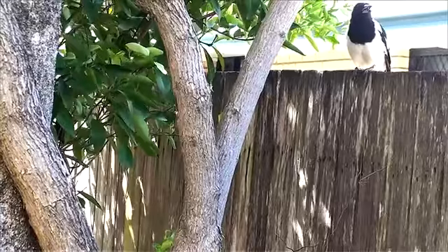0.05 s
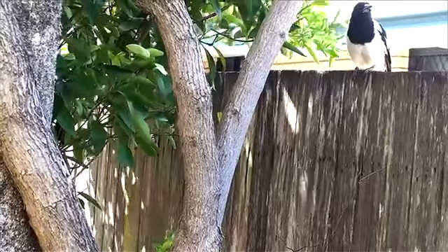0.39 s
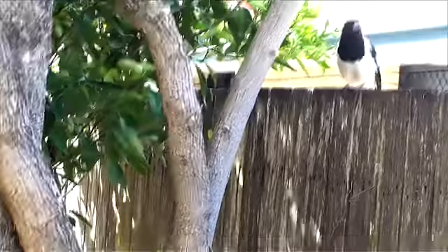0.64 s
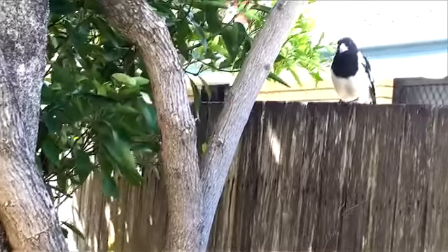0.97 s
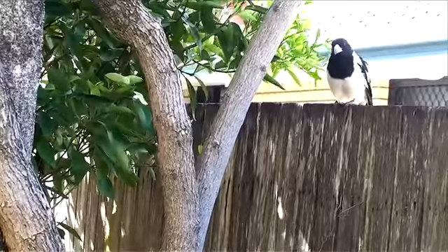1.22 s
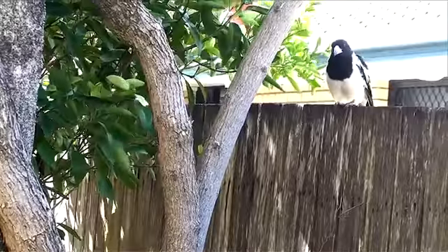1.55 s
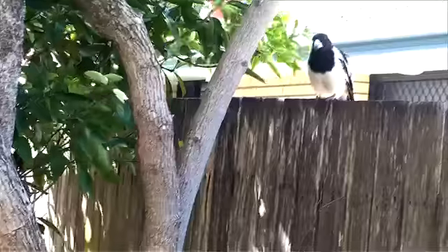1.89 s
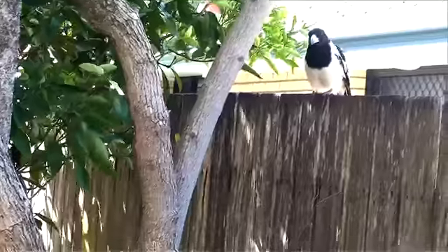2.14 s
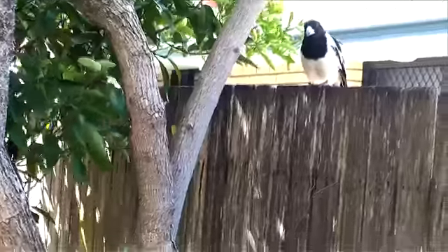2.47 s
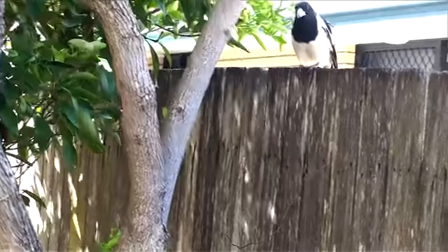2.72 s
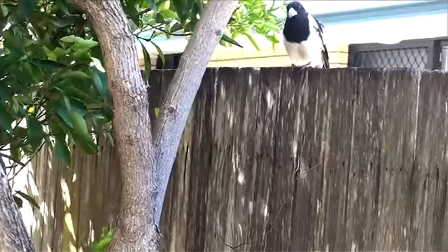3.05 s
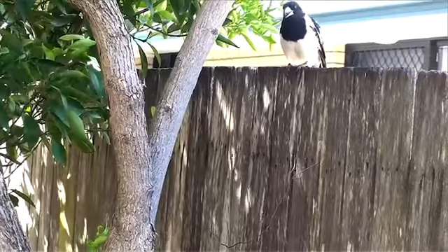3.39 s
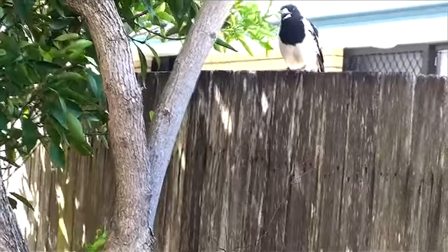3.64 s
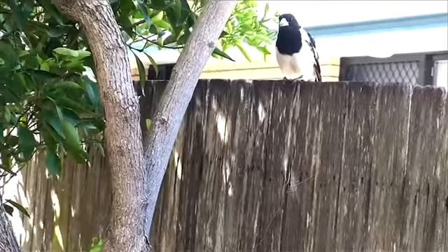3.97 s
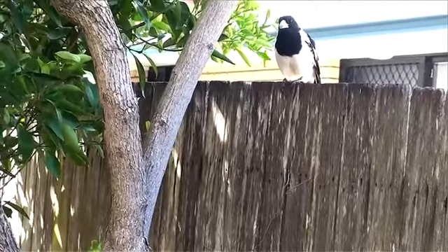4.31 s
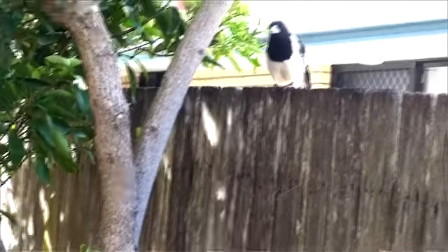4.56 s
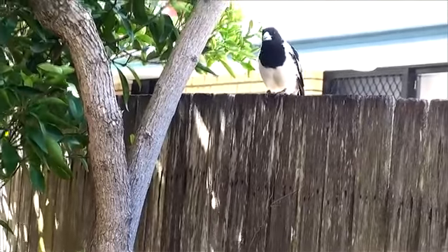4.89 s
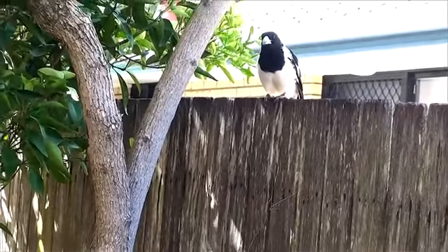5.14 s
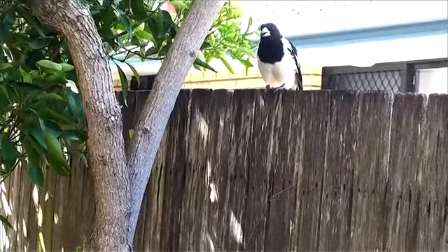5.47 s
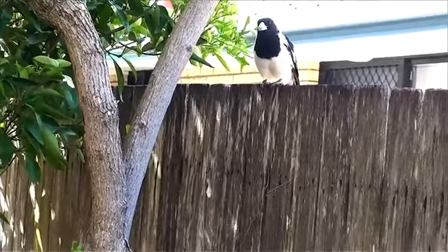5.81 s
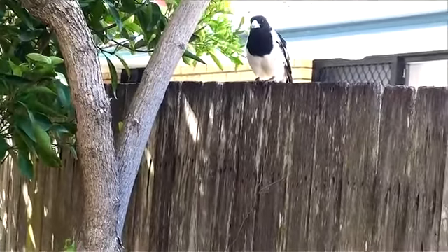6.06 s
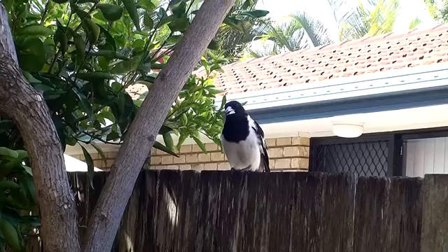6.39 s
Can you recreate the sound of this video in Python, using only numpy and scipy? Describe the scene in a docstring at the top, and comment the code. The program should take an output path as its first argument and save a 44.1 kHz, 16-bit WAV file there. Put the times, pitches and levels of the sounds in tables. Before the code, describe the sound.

Fluted notes, sharp whips and piping from one bird, with another chirping thinly farther off, over soft hiss and low wind rumble.

```python
"""A black-and-white songbird on a garden fence sings a quiet, varied song: fluted notes, two-voiced
chuckles, whip-like glides, rasps and a piping trill. Each side of its syrinx is an oscillator whose
overtones are filtered by the beak; the rasps are throat noise. Another bird answers with thin rising
chirps. Fence, ground and house reflect the sound and leaves scatter it, over distant traffic, leaf
hiss and puffs of wind that rumble on the microphone."""
import sys
import numpy as np
from scipy import signal
from scipy.fft import rfft, irfft, next_fast_len
from scipy.io import wavfile
from scipy.ndimage import uniform_filter1d, map_coordinates

SR = 44100
rng = np.random.default_rng(int(sys.argv[2]) if len(sys.argv) > 2 else 0)


def generate_wav(sig):
    """Save sig (samples, or channels by samples) to the path in sys.argv[1] as 16-bit PCM at SR."""
    pcm = np.round(np.clip(np.atleast_2d(sig).T, -1, 1) * 32767).astype(np.int16)
    wavfile.write(sys.argv[1], SR, pcm)


N = 287973

# The long fluted note sinks slowly, with one small lift: t/s, f/Hz
FLUTE_MELODY = [(2.51, 807), (2.55, 768), (2.62, 803), (2.644, 885), (2.674, 817), (2.78, 765),
                (2.92, 730.5), (3.0, 712), (3.07, 679), (3.115, 650)]
# Its swells: t/s, length/s, crest/fraction of length, level/dB, overtones/dB re fundamental
FLUTE_PULSES = [(2.52, 0.068, 0.9, -24, -36), (2.587, 0.049, 0.31, -21, -38),
                (2.644, 0.026, .5, -27.5, -32), (2.67, .05, 0.39, -20.5, -38),
                (2.734, 0.091, 0.77, -18, -33), (2.842, 0.086, 0.13, -24, -22.5),
                (2.934, 0.17, 0.24, -27, -31)]
FLUTE_TAPER_S, FLUTE_TAPER_DB = .035, 12
# Two voices about a fourth apart: peak t/s, length/s, low f/Hz, level/dB, high f/Hz, level/dB
CHUCKLE_PAIRS = [(1.083, 0.041, 884, -31.5, 1155, -34), (1.217, 0.037, 850, -38, 1132, -31),
                 (1.29, 0.04, 902, -24, 1080, -36.5), (1.315, .026, 820, -35, 1030, -40),
                 (1.39, 0.033, 889, -30.5, 1142, -29)]
# Glides: t/s, length/s, start f/Hz, end f/Hz, crest/fraction of length, relative level/dB,
# overtones/dB re fundamental
WHISTLE_GLIDES = [(.645, 0.028, 1660, 1400, 0.45, -40, -30), (2.35, 0.046, 1233, 1225, 0.99, -25.5, -30),
                  (2.402, 0.024, 1170, 1084, .4, -32.5, -30), (4.338, 0.05, 1206, 1205, 0.96, -27, -23),
                  (4.39, .032, 1500, 1636, 0.14, -29, -30)]
WHIP_GLIDES = [(0, 0.02, 3730, 2860, 0.15, -27.5, -21.5), (.024, 0.021, 2680, 2740, 0.74, -26, -14.5),
               (.051, 0.035, 2743, 2890, .38, -13.5, -22.5)]
ZIP_GLIDES = [(.268, .044, 4396, 1595, 0.45, -29.5, -15.5), (3.41, 0.021, 1786, 2250, .3, -39.5, -25),
              (3.436, 0.067, 2660, 6400, 0.42, -25, -21), (3.818, .02, 1906, 2450, .3, -38, -24),
              (3.846, 0.03, 2950, 4610, .5, -27, -18), (3.96, 0.03, 2253, 2520, 0.43, -39, 2)]
WHEEZE_GLIDES = [(1.83, 0.063, 2250, 2300, .6, -36.5, -9), (1.895, 0.079, 2160, 2330, 0.37, -32, -21),
                 (1.835, 0.11, 4600, 3800, .4, -41, -24), (1.975, .048, 3950, 3400, .6, -37.5, -22)]
GROWL_GLIDES = [(6.165, 0.028, 1047, 1070, 0.42, -41, -20), (6.235, 0.044, 1090, 1120, 0.8, -39, -26),
                (6.31, 0.048, 761, 813, 0.5, -32.5, -4), (6.385, 0.037, 845, 930, 0.91, -38, -6),
                (6.45, 0.061, 770, 985, .4, -35.5, -3)]
# Arches: t/s, length/s, start f/Hz, crest f/Hz, end f/Hz, level/dB, overtones/dB re fundamental
SQUEAL_ARCHES = [(.43, 0.055, 4200, 4296, 4270, -32.5, -14), (.48, 0.046, 4390, 4660, 4210, -25.5, -9),
                 (.512, 0.022, 4300, 4000, 3900, -32.5, -16), (.517, .034, 4650, 4720, 4580, -24.5, -12),
                 (.556, 0.032, 4560, 4500, 4530, -27.5, -13)]
PIPE_ARCHES = [(5.382, 0.039, 2596, 2850, 2280, -22, -21), (5.457, .046, 2420, 2818, 2390, -21.5, -29),
               (5.463, 0.028, 3150, 3190, 3080, -38, -30), (5.544, .047, 2600, 2780, 2584, -15, -27),
               (5.64, 0.04, 2596, 2665, 2570, -14, -17), (5.736, 0.04, 2756, 2666, 2606, -16.5, -11.5)]
CHURR_ARCHES = [(4.836, 0.022, 2038, 2170, 1950, -35.5, -16), (4.866, .05, 2204, 2510, 2340, -28.5, -22),
                (4.918, 0.033, 2400, 2440, 2105, -27.5, -16), (4.958, .036, 2300, 2460, 2400, -40, -20)]
# One loud downward crack: t/s, f/Hz, level/dB, overtones/dB re fundamental
CRACK_CONTOUR = [(3.612, 4510, -42, -18), (3.632, 3780, -29.5, -19), (3.636, 2975, -19, -20),
                 (3.651, 2590, -15, -12), (3.676, 1980, -19.5, -26), (3.686, 1865, -32, -30)]
# Bursts of throat noise: t/s, length/s, relative level/dB
CHURR_RASPS = [(4.832, .012, -38), (4.868, 0.084, -39), (4.965, 0.053, -45)]
GROWL_RASPS = [(6.17, .12, -44), (6.315, 0.062, -35), (6.39, .06, -38), (6.465, .05, -35.5)]
# Their spectra: f/Hz, relative level/dB
CHURR_SPECTRUM = [(1200, -40), (2300, 5), (3100, -7), (3750, 5), (4300, -3), (7000, -6), (10000, -15),
                  (13000, -14), (15000, -29)]
GROWL_SPECTRUM = [(450, -35), (800, 6), (1250, -2), (1600, -4), (2100, -4), (2800, -27), (5000, -50)]
# Beak response, a further gain on the songbird's overtones: f/Hz, gain/dB
BEAK_RESPONSE = [(1500, 2.5), (5400, -3.5), (7000, 3.5), (8100, 9.5), (9300, -4.5), (11000, 1.5),
                 (14000, -4)]
# The other bird's upslurs: t/s, length/s, start f/Hz, end f/Hz, fundamental/dB, octave/dB
ANSWER_CHIRPS = [(0.158, 0.031, 2427, 3040, -42, -37.5), (.548, 0.017, 2630, 2880, -65, -36),
                 (1.058, 0.039, 2450, 3166, -41.5, -36), (1.796, 0.037, 2320, 3030, -40, -33),
                 (2.87, .03, 2485, 2976, -37, -40.5), (4.475, 0.041, 2440, 2955, -31, -34)]

# Reflections from fence, ground and house: delay/s, gain/dB
ECHO_PATHS = [(.0085, -12), (0.0121, -10.5), (0.026, -15.5), (0.051, -24)]
# Reverberation times: f/Hz, T60/s
LEAF_DECAY = [(700, 0.024), (3000, 0.1), (9000, .1)]
GARDEN_DECAY = [(700, 0.1), (2700, 0.55), (5000, 0.36), (10000, 0.32)]
# Initial spectrum of both diffuse fields: f/Hz, relative level/dB
DIFFUSE_SPECTRUM = [(700, 11), (1300, 7), (2700, -7.5), (5000, -3), (9000, 0)]

# Spectra of traffic, leaf hiss, its thin top and wind: f/Hz, relative level/dB
TRAFFIC_SPECTRUM = [(13, -34), (22, 1.5), (91, -1), (123, -3), (162, -1.5), (242, -6.5), (374, -4.5),
                    (675, -6.5), (749, -7), (1400, -11.5), (1820, -16), (3080, -120)]
HISS_SPECTRUM = [(530, -31), (900, -1.5), (1080, -6), (1500, -9), (1680, -5.5), (3610, -8), (4160, -8.5),
                 (6540, -8.5), (10500, -16.5), (13600, -46), (22000, -120)]
HISS_TOP_SPECTRUM = [(9500, -47), (11000, -12), (11400, -0.5), (12800, -4.5), (14000, -11), (15000, -19)]
WIND_SPECTRUM = [(12, -33), (22, -0.5), (43, -1), (75, 0.5), (140, -10.5), (220, -17.5), (320, -30),
                 (500, -33), (800, -82)]
# Slow swells of traffic and hiss: t/s, relative level/dB
TRAFFIC_SWELL = [(0.0, -49), (4.38, -41), (6.53, -42)]
HISS_SWELL = [(0, -52), (1.5, -49.5), (3.2, -48), (4.7, -46.5), (6.53, -47)]
# Puffs of wind on the microphone: peak t/s, length/s, level/dB
WIND_PUFFS = [(0.137, 0.22, -28), (.28, 0.047, -24), (0.452, 0.057, -32.5), (.54, 0.033, -21),
              (0.875, 0.3, -28), (1.091, 0.068, -22.5), (1.463, 0.21, -36), (2.374, 0.2, -31),
              (2.892, 0.14, -28), (3.067, 0.26, -35), (4.055, 0.14, -23.5), (4.21, 0.1, -29)]


def soft_song():
    """Weak overtones leave flutes, whistles and chuckles nearly pure; stronger ones colour the hoot."""
    song = syrinx(flute(), jitter=.0083, flutter_db=1, rate_hz=109, rolloff_db=20)
    whistles = glides(WHISTLE_GLIDES, fade_db=6.5)
    song += syrinx(whistles, jitter=.012, flutter_db=.9, rate_hz=128, rolloff_db=20)
    song += syrinx(chuckles(), jitter=.01, flutter_db=2.5, rate_hz=147, rolloff_db=12)
    return song + syrinx(hoot(), jitter=.018, flutter_db=1, rate_hz=261, rolloff_db=20)


def clear_song():
    """Shallow frequency modulation keeps whips, squeals and pipes clear in pitch; the churr joins them."""
    whips = glides(WHIP_GLIDES, fade_db=11) + [CRACK_CONTOUR]
    squeals = arches(SQUEAL_ARCHES, fade_db=7.5)
    pipes = arches(PIPE_ARCHES, fade_db=13)
    song = syrinx(whips, jitter=.014, flutter_db=2, rate_hz=321, rolloff_db=8)
    song += syrinx(squeals, jitter=.0225, flutter_db=3.5, rate_hz=278, rolloff_db=20)
    song += syrinx(pipes, jitter=.0053, flutter_db=.5, rate_hz=272, rolloff_db=13)
    return song + churr()


def harsh_song():
    """Deep random modulation broadens the partials of zips, wheezes and growls; growls also rasp."""
    zips = glides(ZIP_GLIDES, fade_db=10)
    wheezes = glides(WHEEZE_GLIDES, fade_db=7)
    growls = glides(GROWL_GLIDES, fade_db=6)
    song = syrinx(zips, jitter=.046, flutter_db=3, rate_hz=770, rolloff_db=18)
    song += syrinx(wheezes, jitter=.063, flutter_db=3.5, rate_hz=700, rolloff_db=10)
    song += syrinx(growls, jitter=.035, flutter_db=4, rate_hz=236, rolloff_db=23)
    return song + rasps(GROWL_RASPS, GROWL_SPECTRUM, flutter_db=4.6, rate_hz=160)


def syrinx(notes, jitter, flutter_db, rate_hz, rolloff_db, edge_s=.004):
    """Source and filter: an oscillator, unsteady at rate_hz, sends its overtones through the beak."""
    track = np.zeros(N)
    for rows in notes:
        times, pitch, level_db, overtone_db = np.transpose(rows)
        t = np.arange(max(times[0] - edge_s, 0), times[-1] + edge_s, 1 / SR)
        hz = uniform_filter1d(np.interp(t, times, pitch), size=128)
        hz *= 1 + jitter * wobble(rate_hz, len(t))
        phase = 2 * np.pi * np.cumsum(hz) / SR
        overtones = sum(amp(along(BEAK_RESPONSE, k * hz) - rolloff_db * (k - 2)) * np.sin(k * phase)
                        for k in range(2, 6))
        tone = np.sin(phase) + amp(np.interp(t, times, overtone_db)) * overtones
        gate = np.sin(np.pi / 2 * np.clip(np.minimum(t - t[0], t[-1] - t) / edge_s, 0, 1)) ** 2
        envelope = gate * np.interp(t, times, amp(level_db))
        flutter = amp(flutter_db * wobble(rate_hz, len(t)))
        add(track, t[0], np.sqrt(2) * envelope * flutter * tone)
    return track


def flute():
    """Amplitude modulation divides one sinking note into swells, eased in and out as a whole."""
    times, melody = np.transpose(FLUTE_MELODY)
    notes = []
    for start, length, crest, db, overtone_db in FLUTE_PULSES:
        t = start + length * progress()
        taper = np.clip(1 - np.minimum(t - times[0], times[-1] - t) / FLUTE_TAPER_S, 0, 1)
        level_db = db - FLUTE_TAPER_DB * taper
        pitch = np.interp(t, times, melody)
        notes.append(contour(start, length, pitch, crest, level_db, overtone_db, fade_db=9.5))
    return notes


def chuckles(overtone_db=-35):
    """Biphonation: the two sides of the syrinx each sound a short arched note at once."""
    return [[(peak - length / 2, .93 * hz, db - 10, overtone_db),
             (peak, hz, db, overtone_db),
             (peak + length / 2, .924 * hz, db - 18, overtone_db)]
            for peak, length, *voices in CHUCKLE_PAIRS for hz, db in (voices[:2], voices[2:])]


def hoot(top_hz=928, droop_hz=209):
    """Overtone strength sets timbre: one low arch, pure at the top and reedy where its pitch droops."""
    droop = hump(progress(), crest=.55)
    return [contour(start=5.245, length=.09, pitch=top_hz - droop_hz * droop, crest=.6,
                    db=-27, overtone_db=-23.5 + 19.5 * droop, fade_db=2)]


def churr(pulse_hz=54, depth_db=3.2):
    """Pulsing airflow modulates the amplitude of a wavering tone and its throat noise together."""
    throb = amp(depth_db * np.sin(2 * np.pi * pulse_hz * np.arange(N) / SR))
    notes = arches(CHURR_ARCHES, fade_db=6.5)
    tone = syrinx(notes, jitter=.036, flutter_db=2.5, rate_hz=410, rolloff_db=17)
    return throb * (tone + rasps(CHURR_RASPS, CHURR_SPECTRUM, flutter_db=3.2, rate_hz=270))


def rasps(table, spectrum, flutter_db, rate_hz, attack_s=.0084, release_s=.022):
    """Bursts of broadband throat noise grow exponentially, hold and decay exponentially."""
    t = np.arange(N) / SR
    envelope = np.zeros(N)
    for start, length, db in table:
        ramps = np.minimum((t - start) / attack_s, (start + length - t) / release_s)
        envelope = np.maximum(envelope, amp(db) * np.exp(np.minimum(ramps, 0)))
    return envelope * fluttering_noise(spectrum, flutter_db, rate_hz)


def glides(table, fade_db):
    """Exponential sweeps: pitch moves at a steady rate in octaves."""
    return [contour(start, length, start_hz * (end_hz / start_hz) ** progress(), *dynamics, fade_db)
            for start, length, start_hz, end_hz, *dynamics in table]


def arches(table, fade_db, crest=.443):
    """Parabolic sweeps: pitch bends through the crest frequency, where the note is loudest."""
    u = progress()
    notes = []
    for start, length, start_hz, crest_hz, end_hz, db, overtone_db in table:
        bend_hz = np.where(u < crest, start_hz, end_hz) - crest_hz
        pitch = crest_hz + bend_hz * hump(u, crest)
        notes.append(contour(start, length, pitch, crest, db, overtone_db, fade_db))
    return notes


def contour(start, length, pitch, crest, db, overtone_db, fade_db):
    """A note's envelope falls by fade_db either side of its crest: t/s, f/Hz, level/dB, overtones/dB."""
    u = progress()
    level_db = db - fade_db * hump(u, crest)
    return np.transpose([start + length * u, pitch, level_db, overtone_db + np.zeros_like(u)])


def answering_bird(jitter=.012, flutter_db=1.4, third_db=-47):
    """A farther bird sweeps a harmonic series upward in trembling chirps, often strongest at the octave."""
    track = np.zeros(N)
    for start, length, start_hz, end_hz, first_db, octave_db in ANSWER_CHIRPS:
        u = np.linspace(0, 1, int(length * SR))
        hz = (start_hz + (end_hz - start_hz) * u) * (1 + jitter * wobble(236, len(u)))
        phase = 2 * np.pi * np.cumsum(hz) / SR
        tone = sum(amp(db) * np.sin(k * phase) for k, db in enumerate((first_db, octave_db, third_db), 1))
        envelope = np.abs(np.sin(np.pi * u ** 1.22)) ** .58
        flutter = amp(flutter_db * wobble(250, len(u)))
        add(track, start, np.sqrt(2) * envelope * flutter * tone)
    return track


def reflections(x):
    """Specular reflection: fence, ground and house return delayed, weaker copies."""
    return filtered(x, lambda hz: sum(amp(db) * np.exp(-2j * np.pi * hz * delay)
                                      for delay, db in ECHO_PATHS))


def scatter(x, decay, build_s):
    """Diffuse reverberation builds up, then decays exponentially, each frequency at its own rate."""
    hz, t, bins = signal.stft(rng.standard_normal(SR * 3 // 4), SR, nperseg=256)
    level_db = along(DIFFUSE_SPECTRUM, hz)[:, None] - 60 * t / along(decay, hz)[:, None]
    onset = 1 - np.exp(-t / build_s)
    tail = signal.istft(bins * amp(level_db) * onset, SR, nperseg=256)[1]
    return signal.fftconvolve(x, tail / np.linalg.norm(tail))[:N]


def traffic():
    """Distant traffic merges into low-frequency noise that swells slowly."""
    return amp(3.5) * swell(TRAFFIC_SWELL) * noise(TRAFFIC_SPECTRUM)


def leaf_hiss():
    """Leaves add incoherently to a broadband hiss with a thin top."""
    return swell(HISS_SWELL) * (amp(6) * noise(HISS_SPECTRUM) + amp(-4.5) * noise(HISS_TOP_SPECTRUM))


def wind(calm_db=-46.5):
    """Pressure fluctuations on the microphone: Gaussian puffs add in power to a faint rumble."""
    t = np.arange(N) / SR
    puff_power = sum(amp(db) ** 2 * np.exp(-(2 * (t - peak) / length) ** 2)
                     for peak, length, db in WIND_PUFFS)
    rumble = fluttering_noise(WIND_SPECTRUM, flutter_db=3.2, rate_hz=24.78)
    return np.sqrt(amp(calm_db) ** 2 + puff_power) * rumble


def noise(spectrum):
    """White noise filtered to a spectrum, at unit rms."""
    return unit(filtered(rng.standard_normal(N), lambda hz: amp(along(spectrum, hz))))


def fluttering_noise(spectrum, flutter_db, rate_hz):
    """Coloured noise under random amplitude modulation, at unit rms."""
    return unit(noise(spectrum) * amp(flutter_db * wobble(rate_hz, N)))


def wobble(rate_hz, size):
    """Smooth random modulation through rate_hz knots a second."""
    knots = rng.standard_normal(int(size * rate_hz / SR) + 4)
    return map_coordinates(knots, [np.arange(size) * rate_hz / SR])


def filtered(x, response):
    """Linear filtering: the spectrum is multiplied by a frequency response."""
    size = next_fast_len(N + SR // 2)
    return irfft(rfft(x, size) * response(np.fft.rfftfreq(size, 1 / SR)), size)[:N]


def along(points, hz):
    """Interpolation of (f/Hz, value) points on a logarithmic frequency axis."""
    frequencies, values = np.transpose(points)
    return np.interp(np.log(hz + 1), np.log(frequencies + 1), values)


def swell(rows):
    """Amplitude envelope through (t/s, level/dB) rows, silent outside them."""
    times, db = np.transpose(rows)
    return amp(np.interp(np.arange(N) / SR, times, db, left=-120, right=-120))


def hump(u, crest):
    """Parabolic rise from 0 at the crest, kept just inside the note, to 1 at both ends."""
    crest = np.clip(crest, .05, .95)
    return np.where(u < crest, (crest - u) / crest, (u - crest) / (1 - crest)) ** 2


def progress():
    """Normalised time through a note."""
    return np.linspace(0, 1, 25)


def add(track, start, sound):
    """Superposition of a sound on the track from start/s."""
    part = track[max(round(start * SR), 0):][:len(sound)]
    part += sound[:len(part)]


def amp(db):
    """Amplitude ratio of a level."""
    return 10 ** (np.asarray(db) / 20)


def unit(x):
    """Normalisation to unit rms."""
    return x / np.sqrt(np.mean(x ** 2) + 1e-20)


def scene():
    """Superposition of direct song, reflections, leaf scatter, garden reverberation and background."""
    soft, clear, harsh, far = soft_song(), clear_song(), amp(-2) * harsh_song(), answering_bird()
    direct = soft + clear + harsh + far
    echoes = reflections(amp(-6.5) * soft + amp(-1) * (clear + harsh + far))
    # the long waves of the soft, low notes pass the leaves unscattered
    leaves = scatter(amp(-9.5) * clear + amp(-5.5) * harsh + amp(-8) * far, LEAF_DECAY, build_s=.0042)
    into_garden = amp(-15.5) * soft + amp(-12) * clear + amp(-10.5) * harsh + amp(-7) * far
    garden = scatter(into_garden, GARDEN_DECAY, build_s=.027)
    return direct + echoes + leaves + garden + traffic() + leaf_hiss() + wind()


def record(dry):
    """Band limiting: an ideal low-pass filter removes the highest treble."""
    cutoff_hz = 15020
    return filtered(dry, lambda hz: hz < cutoff_hz)


dry = scene()
out = record(dry)
generate_wav(out)
```